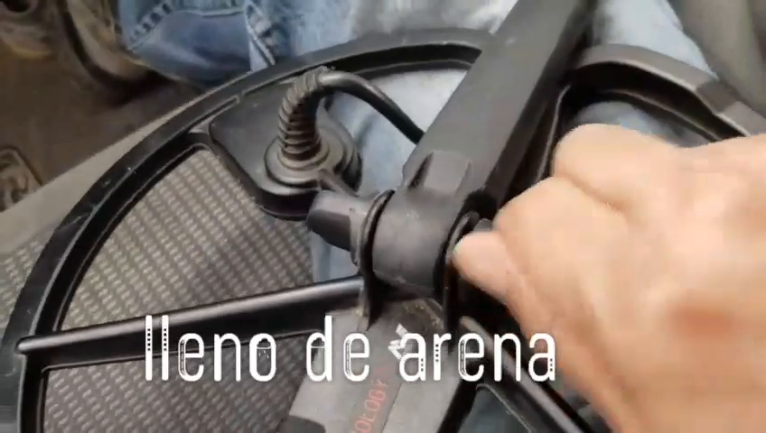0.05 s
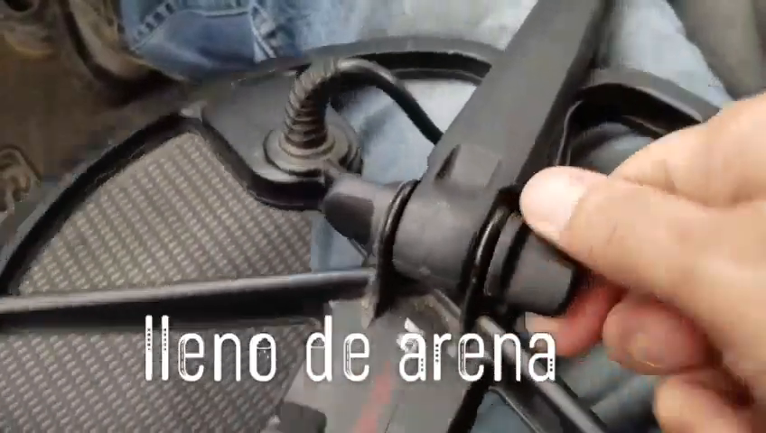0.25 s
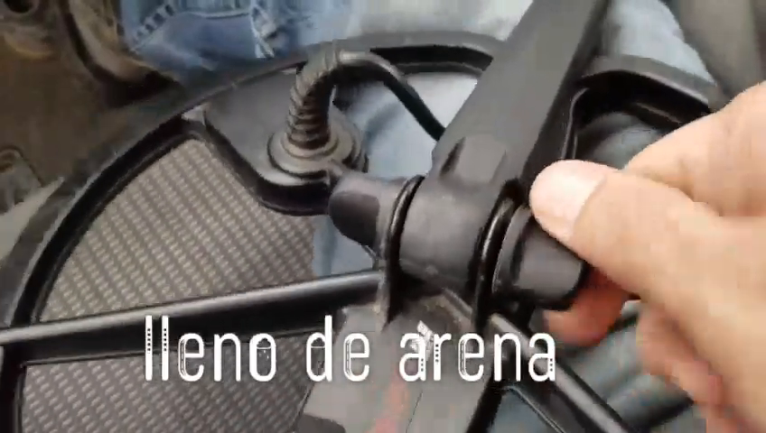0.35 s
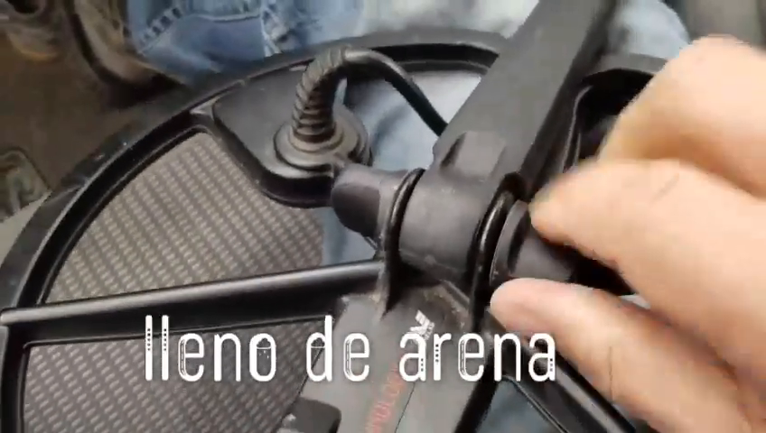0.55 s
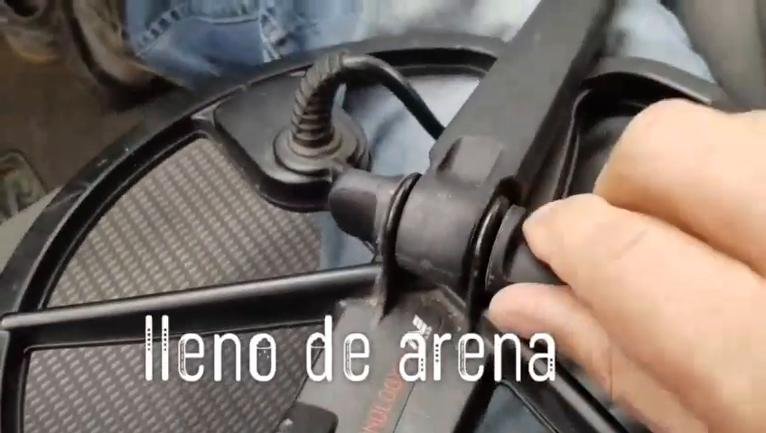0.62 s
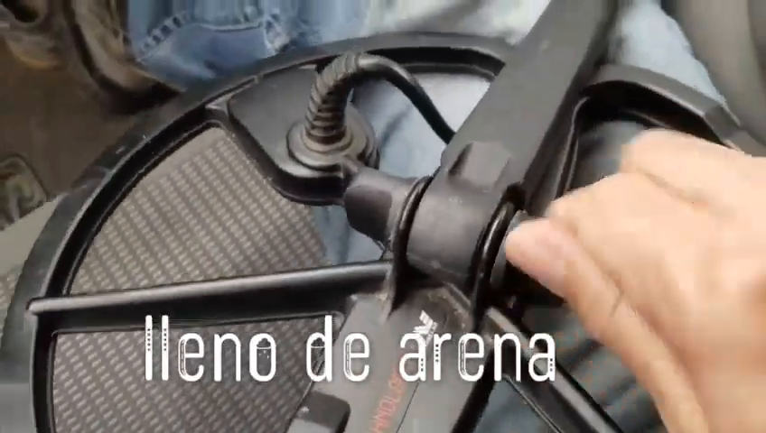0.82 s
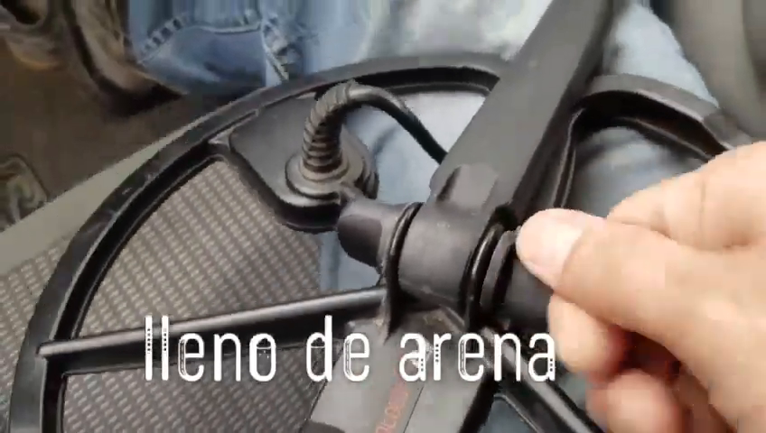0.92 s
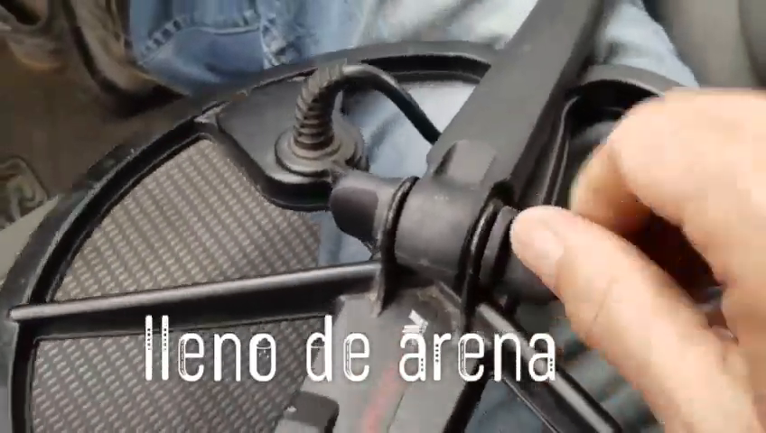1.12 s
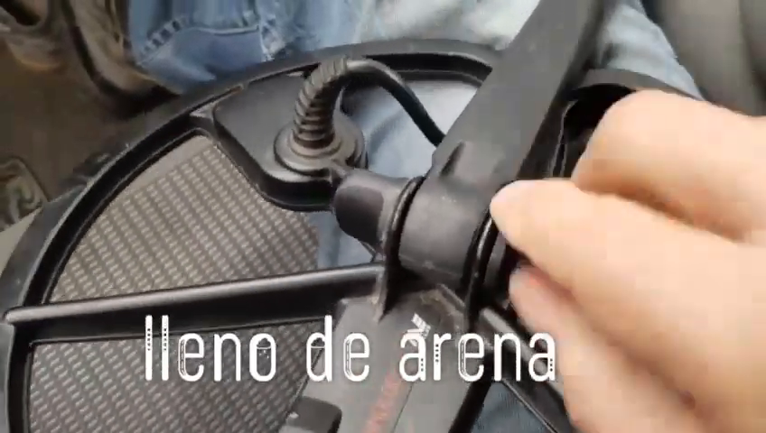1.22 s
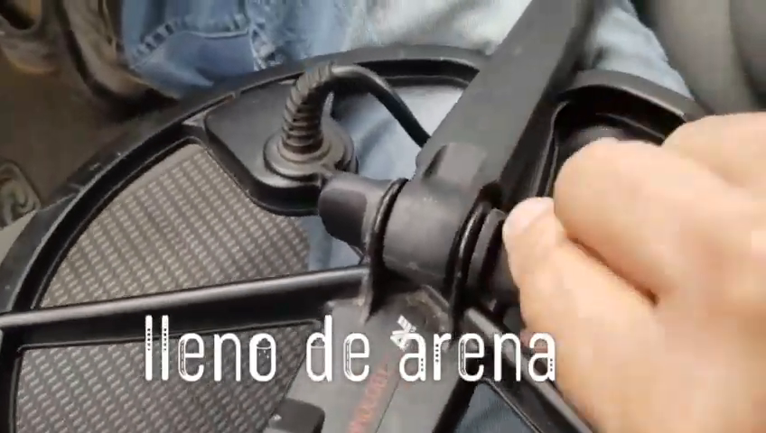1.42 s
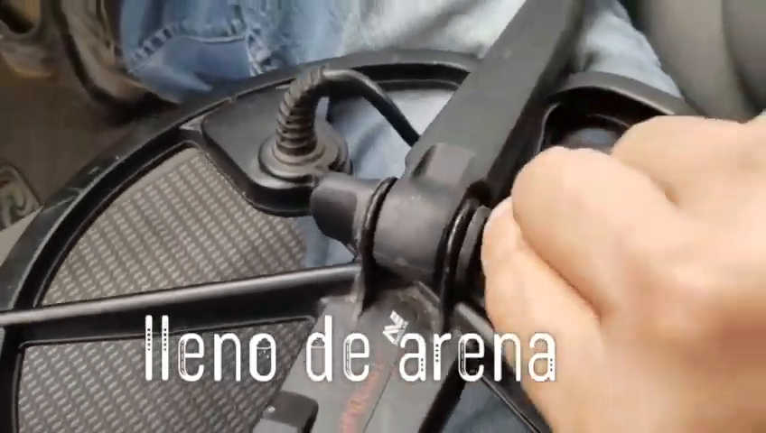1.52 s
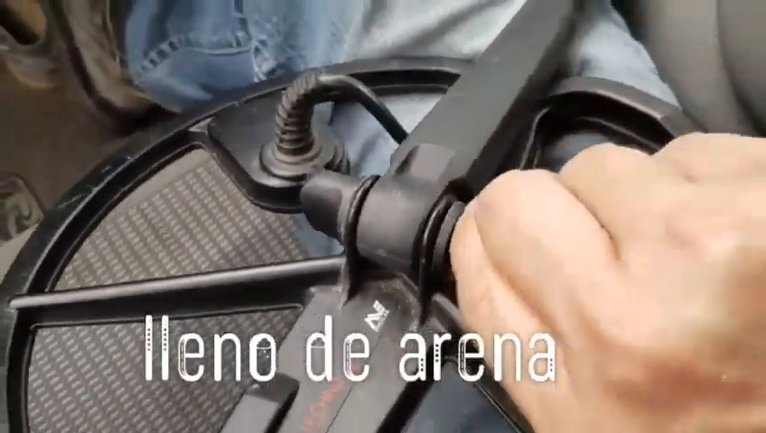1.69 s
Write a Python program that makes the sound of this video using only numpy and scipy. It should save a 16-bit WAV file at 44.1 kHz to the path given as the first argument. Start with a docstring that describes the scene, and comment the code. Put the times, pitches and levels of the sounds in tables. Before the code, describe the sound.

Close up in a quiet room, a plastic knob grinds through sand as fingers twist it. Uneven clicks and soft handling thuds surround one loud early clack, and two brief, hissy squeaks come near the end.

```python
"""A hand turns a sand-clogged plastic knob on the joint of a metal detector, close by in a quiet room.
From the start, grit grinds in the thread over a soft handling rumble. From 0.2 s the knob catches and
slips with clicks that ring the joint, while the frame thuds, sand hisses and fingertips tick.
Just after 0.4 s the joint gives way with one loud clack, then the grinding and clicking go on.
From 1.5 s the dragging knob squeals twice and skin rubs on it with two low, falling tones."""
import sys
import numpy as np
from scipy import signal
from scipy.fft import rfft, irfft, next_fast_len
from scipy.io import wavfile

SR = 44100
rng = np.random.default_rng(int(sys.argv[2]) if len(sys.argv) > 2 else 0)


def master(y):
    """Save y as 16-bit WAV."""
    cut = np.clip(np.atleast_2d(y).T, -1, 1)
    pcm = np.round(cut * 32767)  # scale
    wavfile.write(sys.argv[1], SR, pcm.astype(np.int16))


N = 77175
T = np.arange(N) / SR
SHORT = 8192  # samples in one short sound
AGE = np.arange(SHORT) / SR  # seconds since it began
SPREAD_HZ = 1570  # above this, left and right drift apart


def amp(db):
    """Turn decibels into a gain."""
    return 10 ** (np.asarray(db) / 20)

def unit(x):
    """Scale to an average (rms) level of 1."""
    return x / np.sqrt(np.mean(x ** 2))

def burst(x):
    """Give a short sound the energy of 10 ms at level 1."""
    return unit(x) * np.sqrt(SR / 100 / x.shape[-1])

def fade(t60):
    """Die away by 60 dB in t60 seconds."""
    return np.exp(-np.log(1000) * AGE / t60)

def curve(points):
    """A gain that follows (t/s, level/dB) points."""
    return amp(np.interp(T, *np.array(points).T))

def colour(x, points):
    """Make the tone follow (f/Hz, level/dB) points."""
    n = 2 * next_fast_len(x.shape[-1])
    hz, db = np.array(points).T
    gain = amp(np.interp(np.log(np.fft.rfftfreq(n, 1 / SR) + 1), np.log(hz), db))
    cepstrum = irfft(np.log(gain))
    cepstrum[1:n // 2] *= 2  # folded so that the filter never rings ahead of a sound
    cepstrum[n // 2 + 1:] = 0
    return irfft(rfft(x, n) * np.exp(rfft(cepstrum)))[..., :x.shape[-1]]

def through(x, tail):
    """Give every sample of x the same tail (convolution)."""
    return signal.fftconvolve(x, tail, axes=-1)[:, :x.shape[-1]]

def widen(pair):
    """Mix two signals to left and right: alike in the bass, apart in the treble."""
    mid, side = rfft(pair)
    hz = np.fft.rfftfreq(pair.shape[-1], 1 / SR)
    apart = 0.22 + hz / (hz + SPREAD_HZ)
    return irfft(np.array([mid + apart * side, mid - apart * side]), pair.shape[-1])

def noise(n):
    """Stereo noise."""
    return widen(rng.standard_normal((2, n)))

def add(out, start, x):
    """Mix a sound in at its start time."""
    i = int(start * SR)
    out[:, i:i + x.shape[-1]] += x[..., :N - i]

def grains(n, per_s=8000):
    """A dense stream of tiny cracks of uneven size."""
    size = amp(np.minimum(rng.exponential(size=n), 5))
    return widen(rng.standard_normal((2, n)) * size * (rng.random(n) < per_s / SR))

def gripped(modes, grip_t60):
    """The hand makes each mode (a note that a part rings at) die sooner."""
    return [(hz, db, 1 / (1 / t60 + 1 / grip_t60)) for hz, db, t60 in modes]

def ring(force, modes):
    """A force rings the modes, each slightly off tune; high ones reach left and right out of step."""
    out = 0
    for hz, db, t60 in modes:
        detune, lag = rng.standard_normal(size=2)
        pole = np.exp((2j * np.pi * hz * (1 + .002 * detune) - np.log(1000) / t60) / SR)
        skew = np.exp(1j * lag * hz / (hz + SPREAD_HZ) * np.array([[1], [-1]]))
        note = (signal.lfilter([1], [1, -pole], force) * skew).imag
        out = out + amp(db) * unit(note)
    return unit(out)

def slip(length, modes, crack_db, crack_tone, jerks_per_s=1500):
    """A snap and a run of smaller jerks ring the part, while the rubbing faces crack."""
    jerks = amp(-11) * rng.standard_normal(SHORT) * (rng.random(SHORT) < jerks_per_s / SR)
    jerks *= np.exp(-AGE / length)
    jerks[0] = 1  # the first snap
    crack = burst(colour(noise(SHORT) * fade(.018 + 3 * length), crack_tone))
    rise = 1 - np.exp(-AGE / (.0004 + length / 2))
    return burst((burst(ring(jerks, modes)) + amp(crack_db) * crack) * rise)


# tone of coarse grains cracking: f/Hz, level/dB
CRUNCH_TONE = [(300, -10), (1200, 0), (2800, -1), (4500, -9), (9000, -14)]
def crunches(per_s=70):
    """Coarse grains crack one by one, each with a very short rattle."""
    cracks = (rng.random(N) < per_s / SR) * rng.uniform(.3, 1, N)
    rattle = noise(SHORT) * fade(t60=.01)
    return unit(colour(through(np.array([cracks, cracks]), rattle), CRUNCH_TONE))

# notes the joint rings at, here and in the clicks: f/Hz, level/dB, t60/s
JOINT_MODES = [(321, -9, 0.045), (679.3, -2, 0.34), (1475, 1, 0.044), (1674, -2.5, 0.039), (2066, 2, 0.026),
               (2420, -1.5, 0.074), (3980, -9.5, 0.061), (4176, -1, 0.053), (4283, -2, .012),
               (6000, -11.5, 0.027)]
# tone of the fine sand: f/Hz, level/dB
SAND_TONE = [(100, -7.5), (300, 7.5), (650, 7), (950, 4), (2200, 2), (3200, -2), (4500, -8), (6500, -7.5),
             (9000, -8.5), (11500, -23)]
# how loud the grinding is: t/s, level/dB
GRIND_LEVELS = [(0, -58.5), (.075, -52), (.17, -62), (.255, -51.5), (.29, -61), (.41, -48.5), (.46, -52.5),
                (.54, -58), (.62, -52.5), (.69, -57.5), (.79, -72), (.84, -63), (.868, -51), (.93, -59.5),
                (1.02, -54), (1.085, -48), (1.16, -57), (1.27, -52.5), (1.35, -58.5), (1.465, -59.5),
                (1.545, -59.5), (1.575, -64.5), (1.62, -57.5), (1.69, -65), (1.75, -65)]
def grinding():
    """Fine and coarse sand breaks in the thread; the fine grit also rings the joint."""
    grit = grains(N)
    joint = amp(-20) * ring(grit[0], gripped(JOINT_MODES, grip_t60=.04))
    return (unit(colour(grit, SAND_TONE)) + joint + amp(-8) * crunches()) * curve(GRIND_LEVELS)

# tone of the rumble: f/Hz, level/dB
RUMBLE_TONE = [(25, -47), (48, -15), (65, -4), (100, -7.5), (160, -7.5), (400, -30)]
# how loud the rumble is: t/s, level/dB
RUMBLE_LEVELS = [(0, -56), (.11, -59), (.32, -64.5), (.41, -50), (.5, -58), (.66, -57.5), (.8, -69.5),
                 (1.02, -58), (1.07, -67), (1.17, -54.5), (1.52, -67.5), (1.62, -58.5), (1.72, -67.5)]
def rumble():
    """Handling the frame makes a low noise that swells and sinks."""
    return unit(colour(noise(N), RUMBLE_TONE)) * curve(RUMBLE_LEVELS)

# tone of the quiet room: f/Hz, level/dB
AIR_TONE = [(60, 18), (200, -2), (700, 4.5), (1400, -9.5), (4000, -40), (11000, -19)]
def air():
    """The room's faint, steady background noise."""
    return amp(-67.5) * unit(colour(noise(N), AIR_TONE))

# tone of the knob's crack: f/Hz, level/dB
CRACK_TONE = [(60, -14), (300, 0), (1000, 3), (3000, -1), (6800, -2), (10000, -1), (12000, -11)]
# pitches for bass, middle, presence, bite and treble: f/Hz
BANDS_HZ = (680, 1480, 2250, 4200, 5200)
# slips of the knob: t/s, level/dB, length/s, grip t60/s, knob's own f/Hz, crack against ring/dB,
# then strength against the middle band: bass/dB, presence/dB, bite/dB, treble/dB
KNOB_SLIPS = [(0.2272, -35, 0.0015, 0.27, 5280, -9, -11, -5.5, -1.5, -5),
              (0.3982, -35.5, 0.0014, 0.36, 5190, -3.5, 12.5, 11.5, 12, 13.5),
              (0.5559, -37.5, 0.00044, 1, 5290, -2.5, 5, -12, 7, 3.5),
              (0.606, -46.5, 0.0023, .2, 5170, -5, -4, -6.5, -3, -3),
              (0.6822, -42, 0.0012, 0.68, 5300, -6.5, 3, -27, 1.5, 3.5),
              (1.039, -45.5, 0.0053, .03, 5170, 4, -3, 3, -14, -20),
              (1.071, -36, 0.0042, .07, 4940, -0.5, 0, -12, 0, 5.5),
              (1.09, -45, 0.0035, 0.044, 5020, -4, 3, -19, -1, 3),
              (1.1493, -50, 0.00075, .04, 5200, -11, 2.5, -24, -16, -14),
              (1.2012, -38.5, 0.00081, 0.094, 5230, -6.5, -0.5, -7, -4.5, -1.5),
              (1.4129, -38, 0.0006, 0.15, 5470, -5, -3.5, -0.5, 2.5, -7),
              (1.489, -40.5, 0.0023, 0.24, 5730, -2.5, 5, 2.5, -0.5, -6),
              (1.545, -43.5, 0.0003, 0.023, 5160, -4, 10, 7.5, 7, 3)]
def clicks():
    """The knob catches and slips; each grip strikes, damps and tunes the modes differently."""
    out = np.zeros((2, N))
    for start, db, length, grip_t60, knob_hz, crack_db, bass, *highs in KNOB_SLIPS:
        knob_mode = (knob_hz, 4, .022)
        modes = [(hz, mode_db + np.interp(hz, BANDS_HZ, (bass, 0, *highs)), t60)
                 for hz, mode_db, t60 in [*JOINT_MODES, knob_mode]]
        add(out, start, amp(db) * slip(length, gripped(modes, grip_t60), crack_db, CRACK_TONE))
    return out

# knocks of the frame: t/s, level/dB, f/Hz
FRAME_THUDS = [(0.2285, -50, 294), (0.366, -49, 188), (0.4429, -30, 359), (1.049, -47, 133),
               (1.092, -45.5, 438), (1.11, -45, 410), (1.415, -47, 354)]
def thuds(t60=.017):
    """The frame knocks in the hand: a low note that dies at once, with some clatter."""
    out = np.zeros((2, N))
    for start, db, hz in FRAME_THUDS:
        band = signal.butter(2, (hz / 2, 3 * hz), "band", fs=SR, output="sos")
        clatter = burst(signal.sosfilt(band, noise(SHORT) * fade(2 * t60)))
        note = burst(np.sin(2 * np.pi * hz * AGE) * fade(t60))
        add(out, start, amp(db) * burst(.84 * clatter - note))
    return out

# tone of spraying sand: f/Hz, level/dB
SPRAY_TONE = [(2500, -20), (8500, 6), (11500, 0.5)]
# sprays of sand: t/s, length/s, level/dB
SAND_SPRAYS = [(0.246, 0.028, -51.5), (0.851, 0.032, -49), (0.991, 0.0073, -43.5), (1.048, 0.026, -51),
               (1.271, 0.014, -52.5), (1.361, 0.011, -51)]
def sprays():
    """Sand sprays between the joint's faces with a short, bright hiss."""
    out = np.zeros((2, N))
    for start, length, db in SAND_SPRAYS:
        n = int(length * SR)
        add(out, start, amp(db) * unit(colour(grains(n), SPRAY_TONE)) * signal.windows.tukey(n, .7))
    return out

# fingertips catching on the grip: t/s, level/dB, f/Hz
FINGER_TICKS = [(0.2563, -48, 3040), (0.3423, -47, 2920), (0.37, -50, 2180), (0.3914, -45, 1970),
                (0.4318, -32.5, 3140), (0.472, -49.5, 2850), (0.493, -54, 2630), (0.52, -54.5, 2780),
                (0.645, -51.5, 2960), (0.744, -59.5, 2620), (0.85, -54, 2770), (1.116, -48.5, 2880),
                (1.398, -47, 3030), (1.656, -51, 2950), (1.662, -50, 1970)]
def ticks(rise_s=.0016, relative_width=.13):
    """A fingertip scuffs briefly, making noise gathered around one pitch."""
    out = np.zeros((2, N))
    for start, db, hz in FINGER_TICKS:
        scuff = noise(SHORT) * fade(t60=.038) * (1 - np.exp(-AGE / rise_s))
        pitched = signal.lfilter(*signal.iirpeak(hz, 1 / relative_width, fs=SR), scuff)
        add(out, start, amp(db) * burst(pitched + amp(-25) * scuff))
    return out

# notes the frame rings at: f/Hz, level/dB, t60/s
FRAME_MODES = [(915, -14, .035), (1330, -11, .03), (1475, 0, .03), (1620, -8, .014), (3057, -12, .025),
               (4330, -10, .022), (5130, -15, .02)]
# tone of the crack in the clack: f/Hz, level/dB
CLACK_TONE = [(60, -18), (1500, -2), (4500, -8), (6500, -13), (11000, -10.5)]
def clack():
    """The joint gives way once and rings the frame loudly."""
    out = np.zeros((2, N))
    snap = slip(length=.0015, modes=FRAME_MODES, crack_db=-11, crack_tone=CLACK_TONE)
    add(out, .4357, amp(-23.8) * snap)
    return out

# notes the dragging knob rings at: f/Hz, level/dB, t60/s
SQUEAL_MODES = [(1590, -12, 0.031), (4200, -6, 0.065), (5200, 2, 0.02)]
# drags of the knob: t/s, length/s, level/dB, share of the length spent swelling
KNOB_DRAGS = [(1.518, .034, -43, 0.46), (1.593, .044, -46.5, 0.57)]
def squeals():
    """The dragging knob sticks and slips very fast, swelling into a thin, hissy squeal."""
    out = np.zeros((2, N))
    for start, length, db, peak_at in KNOB_DRAGS:
        n = int(length * SR)
        friction = grains(n)
        squeal = ring(friction[0], SQUEAL_MODES) + amp(-1.5) * unit(colour(friction, CRACK_TONE))
        swell = np.interp(np.arange(n) / n, (0, peak_at, 1), (0, 1, 0))
        add(out, start, amp(db) * unit(squeal) * swell)
    return out

# skin dragging on the knob: t/s, length/s, level/dB, first f/Hz, last f/Hz
SKIN_RUBS = [(1.577, 0.029, -52.5, 266, 181), (1.626, 0.029, -50.5, 159, 70.6)]
def rubs():
    """Skin sticks and slips in a low tone that falls as the finger slows."""
    out = np.zeros((2, N))
    for start, length, db, from_hz, to_hz in SKIN_RUBS:
        n = int(length * SR)
        tone = np.sin(2 * np.pi * np.cumsum(np.linspace(from_hz, to_hz, n)) / SR)
        add(out, start, amp(db) * signal.windows.tukey(n, .5) * tone)
    return out

# how much louder the left is than the right: f/Hz, level/dB
BALANCE = [(60, -5), (300, -2), (700, -2), (1400, 3.5), (2500, 6.5), (5000, 4.5), (10000, 4)]
def scene():
    """The close sounds and a short room echo, lows to the right and highs to the left, over still air."""
    near = grinding() + clicks() + thuds() + sprays() + ticks() + clack() + squeals() + rubs()
    tail = noise(SHORT) * fade(t60=.15) * (1 - np.exp(-AGE / .002))
    echo = amp(-16) * through(near, unit(tail) / np.sqrt(SHORT))
    mix = near + echo + rumble()
    placed = [colour(x, [(hz, side * db / 2) for hz, db in BALANCE]) for x, side in zip(mix, (1, -1))]
    return np.array(placed) + air()

def record(dry, low_hz=55, top_hz=11300):
    """Thin the deepest bass and cut the highest treble steeply."""
    thin = signal.sosfilt(signal.butter(2, low_hz, "high", fs=SR, output="sos"), dry)
    return signal.sosfilt(signal.butter(36, top_hz, fs=SR, output="sos"), thin)


dry = scene()
out = record(dry)
master(out)
```